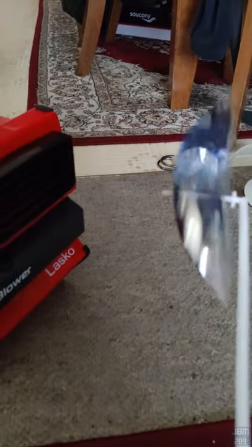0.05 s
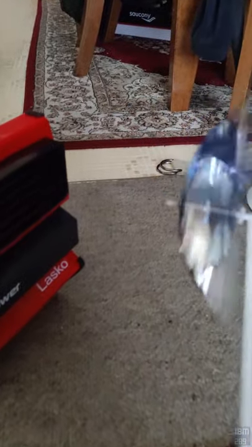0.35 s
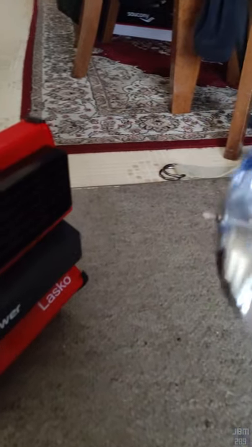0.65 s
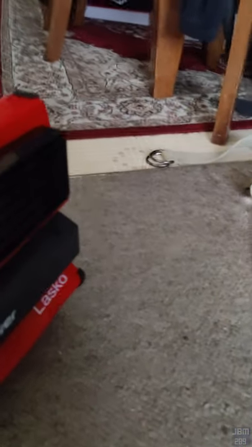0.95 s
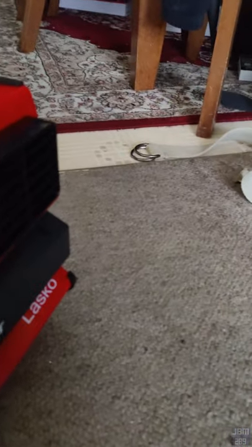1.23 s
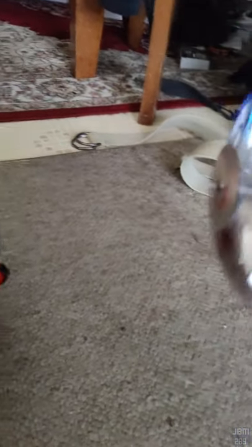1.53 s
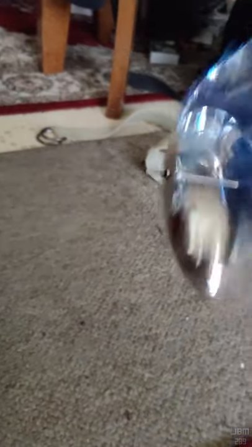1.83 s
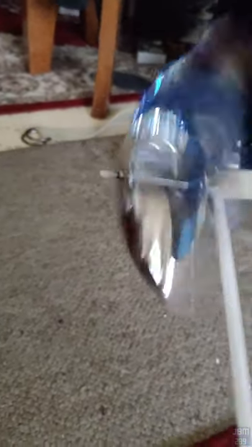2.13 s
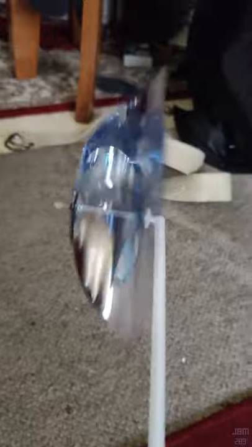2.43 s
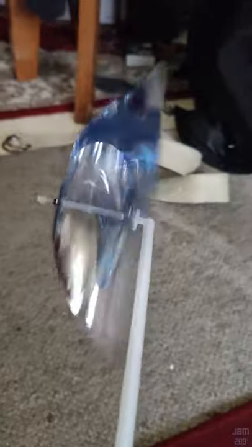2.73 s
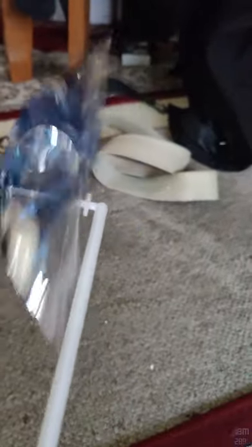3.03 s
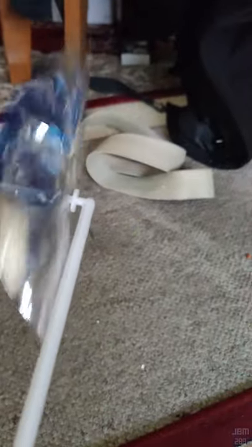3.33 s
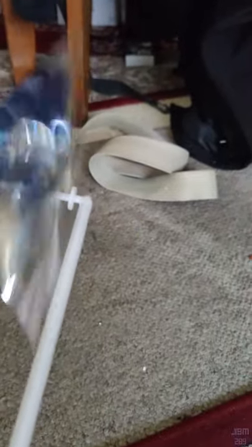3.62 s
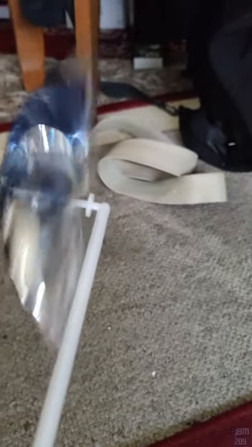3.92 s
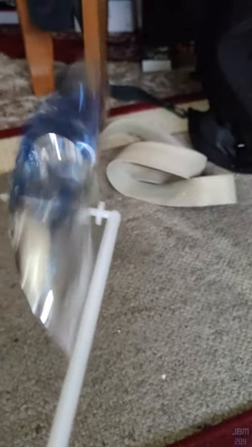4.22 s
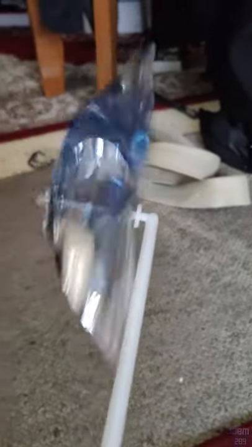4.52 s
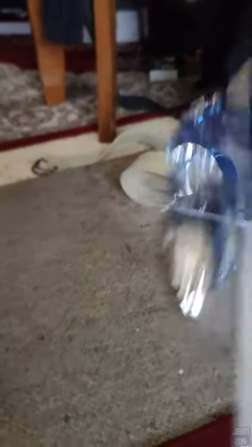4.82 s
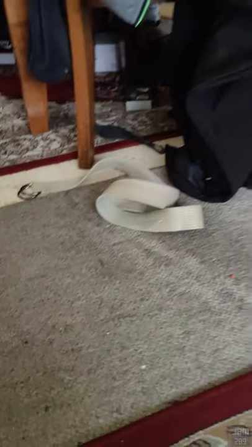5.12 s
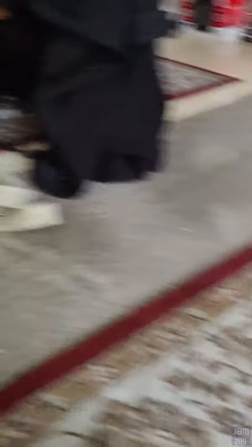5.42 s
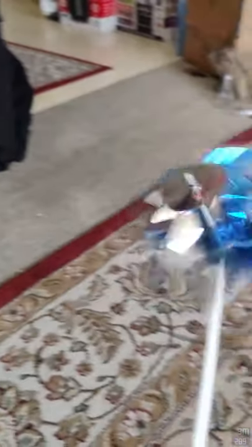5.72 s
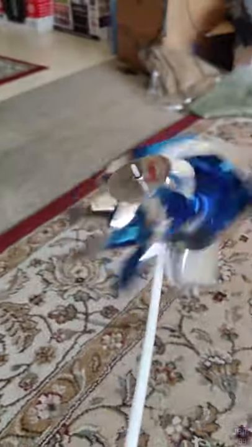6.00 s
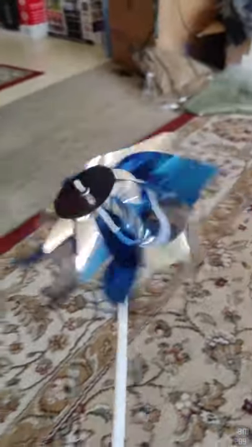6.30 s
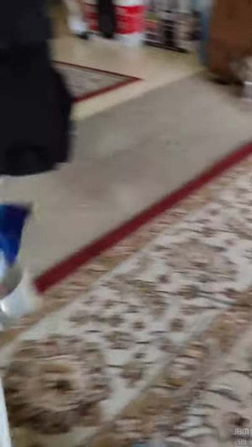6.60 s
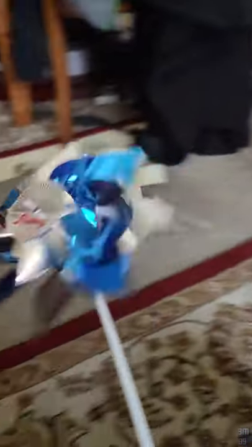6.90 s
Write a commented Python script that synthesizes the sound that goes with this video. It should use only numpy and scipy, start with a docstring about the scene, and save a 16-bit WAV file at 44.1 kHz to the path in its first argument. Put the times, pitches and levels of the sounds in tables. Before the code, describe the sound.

A blower fan hums indoors while a foil pinwheel's vanes slap their stick in a fast, crackling rattle that finally fades.

```python
"""A foil pinwheel spins in the air of a blower fan in a carpeted room, about 18 turns a second.
The air bends its eight vanes back until they slap the stick and the foil buckles: in fits at first,
then, from about 2.9 s, five of them on every turn. Air hisses over the vanes and buffets the microphone.
Carried out of the stream near 5 s, the wheel slows and ticks faintly while the blower hums on."""
import sys
import numpy as np
from scipy import signal
from scipy.fft import rfft, irfft
from scipy.io import wavfile
from scipy.ndimage import uniform_filter1d

SR = 44100
rng = np.random.default_rng(int(sys.argv[2]) if len(sys.argv) > 2 else 0)


def wrap_up_sound(samples):
    """Save the sound to the file named by the first command line argument, as 16-bit audio."""
    columns = np.atleast_2d(samples).T
    # keep every value between -1 and 1, then stretch to whole-number steps
    tamed = np.clip(columns, -1, 1)
    steps = np.round(tamed * 32767).astype(np.int16)
    wavfile.write(sys.argv[1], SR, steps)


N = 315315
TIME_S = np.arange(N) / SR

# vanes in passing order; three never reach the stick (lean at contact [1], level [dB], treble lift [dB])
VANES = [(0.3, -0.5, 2.5), (1.7, -2, 0), (0.46, -3.5, 0.5), (0.57, -3, 0), (0.63, -3.5, 2.5), (1.5, 0, 2.5),
         (1.6, 2.5, 0), (0.65, -2, -2)]
# wheel speed (time [s], speed [turns/s])
SPEED_RPS = [(0, 16.33), (.2, 20.73), (.93, 19.79), (1.25, 17.58), (1.61, 18.88), (1.94, 18.17),
             (2.28, 18.42), (2.83, 18.21), (3.01, 16.82), (3.89, 16.44), (4.67, 16.4), (4.91, 16.75),
             (5.05, 14.71), (7.15, 8.5)]
# air leaning the wheel towards the stick (time [s], lean [0-1])
LEAN = [(0, 0), (.68, 0.06), (.92, 0.26), (1.03, .39), (1.13, 0.54), (1.36, 0.62), (1.5, 0.37),
        (1.72, 0.42), (2.22, 0.53), (2.34, 0.47), (2.77, 0.49), (2.86, .93), (4.8, 0.93), (4.87, 0.46),
        (4.96, 0.29), (5.26, 0.61), (5.34, 0.05)]
# sways of the hand-held wheel (time [s], lean change [1])
SWAYS = [(.5, 0.21), (.81, 0.07), (.88, -.13), (.92, -0.054), (1.04, -0.13), (1.462, -.3), (1.575, -.17),
         (1.625, -.24), (1.67, -.17), (2.71, -0.27), (4.99, -0.25)]
# strength of a full slap (time [s], level [dB])
SLAP_DB = [(0, -3), (.3, -10), (1.1, -9), (2, -8), (2.6, -13.5), (2.9, -9.5), (4.85, -14), (5.05, -21.5),
           (5.3, -20), (5.9, -25), (6.15, -39), (6.48, -37.5), (7.15, -46)]
# single vane slaps on the stick, faint ticks as the wheel slows (time [s], level [dB], treble lift [dB])
SINGLE_HITS = [(.0747, -18, 26), (.129, -20, 29), (1.0747, -2, 5), (1.7029, -1.5, 2), (4.8965, -11, 9),
               (5.3015, -23, 2), (5.3921, -29, -8), (5.5319, -24.5, -2), (5.5534, -27, -9),
               (5.6008, -26.5, -14), (5.6586, -25.5, 1), (5.8305, -25.5, -15), (5.906, -30, 1),
               (6.0103, -33, -11), (6.047, -31.5, -9), (6.1367, -35, -10), (6.4858, -31, -3),
               (6.602, -35.5, -7)]
# foil response (frequency [Hz], relative gain [dB])
FOIL_DB = [(200, -17), (650, -8), (1100, -4), (1700, -2), (2300, -1), (3300, -1), (4800, -1), (6000, 0.5),
           (7300, 6.5), (8500, 1.5), (10000, 4), (11700, -1), (13500, -0.5), (15800, -4.5)]
# foil resonances (frequency [Hz], width [Hz], lift [dB])
FOIL_MODES = [(1710, 330, 1.5), (5490, 160, 5.5), (6600, 700, 3.5), (13350, 1400, 6.5)]
# air over the vanes (frequency [Hz], relative density [dB])
HISS_DB = [(700, -29), (1200, 2), (1750, 3), (2400, 2.5), (3900, 0.5), (5000, -3), (6900, 4.5),
           (8500, -3.5), (10000, -3.5), (11700, -8), (13400, -4), (15800, -9.5)]
# foil rustling as the wheel is turned about (time [s], hiss lift [dB])
RUSTLES = [(5.14, 4), (5.26, 7.5), (6.48, 4)]
# throb overtones (multiple of vane rate [1], level re full slap [dB])
THROB_OVERTONES = [(2, -35), (3, -38.5), (4, -37.5)]
# stream strength at the microphone (time [s], level [dB])
WIND_DB = [(0, -3.5), (1.4, 1.5), (2.6, -1.5), (3.2, -1.5), (4.7, -7.5), (5.1, -17), (5.5, -20),
           (6.2, -30.5), (7.15, -24.5)]
# rush of the stream (frequency [Hz], relative density [dB])
RUSH_DB = [(60, 0.5), (150, 2.5), (400, 0), (550, -3.5), (700, -7.5), (1000, -4.5), (1600, -5.5),
           (3000, -28), (8000, -45)]
# air buffeting the microphone (frequency [Hz], relative density [dB])
BUFFET_DB = [(15, -39.5), (26, -18.5), (36, -9), (62, 17), (80, 8.5), (100, 13.5), (150, -17), (300, -37.5),
             (800, -59.5)]
# gusts on the microphone (time [s], lift [dB])
GUSTS = [(.48, 1.5), (1.61, 3), (2.15, 9.5), (3.95, 4), (4.2, 5), (4.62, 6), (5.02, 8)]
# blower roar (frequency [Hz], relative density [dB])
ROAR_DB = [(20, -25), (60, -1.5), (100, -15), (180, -21), (250, 4.5), (330, 3.5), (400, 2.5), (470, -6.5),
           (650, -8), (850, -4.5), (1050, -8), (2200, -12), (4500, -30.5), (15000, -48)]
# blower whine (frequency [Hz], level [dB])
WHINE_TONES = [(388, -56), (528, -62.5), (662, -58.5), (748, -56.5), (781, -56.5), (797, -52.5), (848, -56),
               (865, -55), (872, -49.5), (899, -51)]
# nearness of the whine (time [s], gain [dB])
WHINE_DB = [(0, 2.5), (.7, 0.5), (1.3, 5.5), (2.2, 3.5), (3, -2.5), (4.8, -6), (5.4, -11), (6.2, -9.5),
            (7.15, -8.5)]
# room reflections (frequency [Hz], gain [dB])
ROOM_DB = [(300, -3.5), (1200, -8), (2500, -1.5), (4500, -3.5), (7000, -9), (10000, -16.5), (15000, -21)]
# room decay (frequency [Hz], T60 [s])
ROOM_T60_S = [(300, 0.32), (2000, 0.06), (7000, 0.04), (15000, 0.071)]


def rattle(pressed_lean=0.7):
    """Vanes slap the stick, ringing lower when pressed close; faint ticks as the wheel slows; room."""
    slaps = vane_passes()
    pressed = curve(LEAN, slaps[:, 0]) > pressed_lean
    close = cracks(slaps[pressed], level_db=-0.6, buckle_s=0.0032, snap_s=0.0023)
    free = cracks(slaps[~pressed], level_db=-0.5, buckle_s=0.0038, snap_s=0.0019)
    direct = vane_ring(close, hz=1730, width_hz=200, share=0.62)
    direct += vane_ring(free, hz=2030, width_hz=500, share=0.49)
    direct += cracks(SINGLE_HITS, level_db=-8, buckle_s=0.0031, snap_s=0.0016, soft_db=-23)
    return direct + room(direct) + knocks(slaps[pressed])


def vane_passes(jitter_s=0.00015, flap_lean=0.02, scatter_db=1.3, bright_db=2.55, dull_below_db=-26):
    """Flapping vanes sweep past the stick, a row each (time [s], level [dB], treble lift [dB])."""
    angle_turns = turns()
    passes = np.arange(int(angle_turns[-1] * len(VANES)))
    at_s = np.interp(passes / len(VANES), angle_turns, TIME_S)
    contact_lean, vane_db, treble_db = np.array(VANES)[passes % len(VANES)].T
    late, force, bright, bend = rng.standard_normal((len(at_s), 4)).T
    shortfall = contact_lean + flap_lean * bend - np.interp(at_s, TIME_S, lean())
    full_db = curve(SLAP_DB, at_s)
    db = full_db + vane_db + contact_db(shortfall) + scatter_db * force
    dull_db = 0.55 * np.maximum(dull_below_db - full_db, 0)  # dull touches far from the stream
    return np.column_stack([at_s + jitter_s * late, db, treble_db - dull_db + bright_db * bright])


def turns(start_turns=-0.2885):
    """Wheel angle [turns]."""
    return start_turns + np.cumsum(curve(SPEED_RPS)) / SR


def lean():
    """Lean towards the stick: air push plus hand sway."""
    return curve(LEAN) + swells(SWAYS, width_s=0.02)


def contact_db(shortfall, graze_db_per_lean=77.5):
    """Full strength once a vane reaches the stick; one that falls short only grazes."""
    return -graze_db_per_lean * np.maximum(shortfall, 0)


def cracks(hits, level_db, buckle_s, snap_s, soft_db=-36, size=1024):
    """Each hit buckles the foil: a few ms of crinkle, coloured anew, the treble shortest."""
    rise_s, tail_s, energy_span_s = 0.0004, 0.008, 0.0034
    tail_db, colour_spread_db, spiky_db = -17, 1.5, 3.0
    hz = np.fft.rfftfreq(size, 1 / SR)
    treble = (1 + np.tanh((hz - 8500) / 2500)) / 2
    octaves = np.log2(1 + hz / 2500)
    out = np.zeros(N)
    for at_s, db, treble_db in hits:
        softness_db = max(soft_db - db, 0)  # soft taps are shorter and duller
        t = np.arange(size) / SR * (1 + 0.051 * softness_db)
        attack = 1 - np.exp(-t / rise_s)
        tail = amp(tail_db) * np.exp(-t / tail_s)
        body, snap = (attack * (np.exp(-(t / fall_s) ** 2) + tail) for fall_s in (buckle_s, snap_s))
        crinkle, creases, spikes = rng.standard_normal((3, size))
        crinkle *= amp(spiky_db * unit(uniform_filter1d(spikes, size=14)))
        spectrum = rfft(crinkle * body) * (1 - treble) + rfft(crinkle * snap) * treble
        colour_db = colour_spread_db * unit(uniform_filter1d(creases, size=30))[:len(hz)]
        colour_db += treble_db * treble - softness_db * octaves
        crack = np.sqrt(energy_span_s * SR / size) * unit(irfft(spectrum * amp(colour_db)))
        add(out, at_s, amp(db + level_db) * crack)
    return foil_ring(out)


def foil_ring(x, size=2048):
    """Foil response and resonances: minimum phase, unit power gain."""
    hz = abs(np.fft.fftfreq(size, 1 / SR))
    modes_db = sum(db / (1 + (2 * (hz - mode_hz) / width_hz) ** 2) for mode_hz, width_hz, db in FOIL_MODES)
    log_gain = np.log(unit(amp(shape(FOIL_DB, hz) + modes_db)))
    impulse = np.fft.ifft(np.exp(signal.hilbert(log_gain).conj())).real
    return signal.oaconvolve(x, impulse[:size // 2])[:N]


def vane_ring(x, hz, width_hz, share):
    """Adds a vane's main resonance."""
    return x + share * signal.lfilter(*signal.iirpeak(hz, hz / width_hz, fs=SR), x)


def knocks(hits, level_db=-9.5, push_s=0.00059, size=512):
    """Slaps give the stick a short, dull push."""
    u = np.arange(size) / SR / push_s
    push = u * (2 - u) * np.exp(-u)
    out = np.zeros(N)
    for at_s, db, _ in hits:
        add(out, at_s, amp(db + level_db) * push)
    return out


def vane_hiss(level_db=-30, db_per_lean=11, swing_db=0.5, crinkle_db=1.6):
    """Air over the vanes: hiss grows with lean and swings once a turn."""
    swing = np.cos(2 * np.pi * turns())
    db = level_db + curve(SLAP_DB) + db_per_lean * curve(LEAN) + swells(RUSTLES, width_s=0.057)
    return noise(HISS_DB) * amp(db + swing_db * swing + crinkle_db * drift(rate_hz=250))


def throb(level_db=-43, close_lean=0.8, waver_db=1.5, flex_rad=0.32):
    """Each vane pushes a puff of air, early or late as it bends; leaning close sharpens the puffs."""
    phase_rad = 2 * np.pi * len(VANES) * turns() + flex_rad * drift(rate_hz=27)
    overtones = sum(amp(db + waver_db * drift(rate_hz=42)) * np.cos(k * phase_rad)
                    for k, db in THROB_OVERTONES)
    tone = amp(level_db + 1.4 * curve(WIND_DB) + waver_db * drift(rate_hz=14)) * np.cos(phase_rad)
    sharpness = amp(curve(SLAP_DB) + contact_db(close_lean - lean()))
    return np.sqrt(2) * (tone + sharpness * overtones)


def air_stream(rush_db=-36, buffet_db=-41, waver_db=1, lump_db=4):
    """The turbulent jet rushes and buffets the microphone."""
    wind_db = curve(WIND_DB)
    rush = noise(RUSH_DB) * amp(rush_db + wind_db + waver_db * drift(rate_hz=12))
    gusty_db = buffet_db + 1.05 * wind_db + swells(GUSTS, width_s=0.097)
    return rush + noise(BUFFET_DB) * amp(gusty_db + lump_db * drift(rate_hz=17))


def blower(roar_db=-51, speed_waver=0.0018, waver_db=1.3):
    """Steady roar plus tones that waver with the motor; neighbouring tones beat."""
    motor_s = np.cumsum(1 + speed_waver * drift(rate_hz=8.7)) / SR
    whine = sum(amp(db + waver_db * drift(rate_hz=6)) * np.sin(2 * np.pi * (hz * motor_s + rng.random()))
                for hz, db in WHINE_TONES)
    return amp(roar_db) * noise(ROAR_DB) + np.sqrt(2) * whine * amp(curve(WHINE_DB))


def room(x, size=128, hop=32, lag_frames=5):
    """Diffuse reflections: each band's energy decays at its own rate, in random phase."""
    framing = dict(fs=SR, nperseg=size, noverlap=size - hop)
    hz, _, bands = signal.stft(x, **framing)
    power_kept = amp(-120 * hop / SR / shape(ROOM_T60_S, hz))
    power = np.array([signal.lfilter([0] * lag_frames + [1 - kept], [1, -kept], abs(band) ** 2)
                      for kept, band in zip(power_kept, bands)])
    scatter = signal.stft(rng.standard_normal(N), **framing)[2]
    tail = scatter / scatter.std() * np.sqrt(power) * amp(shape(ROOM_DB, hz))[:, None]
    return signal.istft(tail, **framing)[1][:N]


def amp(db):
    """Decibels to gain."""
    return 10 ** (np.asarray(db) / 20)


def unit(x):
    """Scales to rms 1."""
    return x / np.sqrt(np.mean(x ** 2) + 1e-20)


def curve(points, at_s=TIME_S):
    """Reads a table over time."""
    return np.interp(at_s, *np.transpose(points))


def shape(points, hz):
    """Reads a table over log frequency."""
    point_hz, value = np.transpose(points)
    return np.interp(np.log(hz + 1), np.log(point_hz + 1), value)


def swells(rows, width_s):
    """A Gaussian bump in time per row."""
    return sum(height * np.exp(-((TIME_S - at_s) / width_s) ** 2) for at_s, height in rows)


def noise(spectrum_db):
    """Shaped noise, rms 1."""
    hz = np.fft.rfftfreq(N, 1 / SR)
    return unit(irfft(rfft(rng.standard_normal(N)) * amp(shape(spectrum_db, hz)), N))


def drift(rate_hz):
    """Low-passed noise, rms 1."""
    hz = np.fft.rfftfreq(N, 1 / SR)
    return unit(irfft(rfft(rng.standard_normal(N)) / (1 + (hz / rate_hz) ** 4), N))


def add(mix, at_s, sound):
    """Mixes a sound in at a time."""
    part = mix[max(round(at_s * SR), 0):][:len(sound)]
    part += sound[:len(part)]


def scene():
    """Pinwheel, air and blower, mono."""
    return (rattle() + vane_hiss() + throb() + air_stream() + blower())[None]


def record(dry):
    """Soft clip of the loudest cracks, then low-pass."""
    ceiling, cutoff_hz = 0.85, 15950
    lowpass = signal.firwin(511, cutoff_hz, window=("kaiser", 9), fs=SR)
    return signal.oaconvolve(ceiling * np.tanh(dry / ceiling), lowpass[None], "same")


dry = scene()
out = record(dry)
wrap_up_sound(out)
```